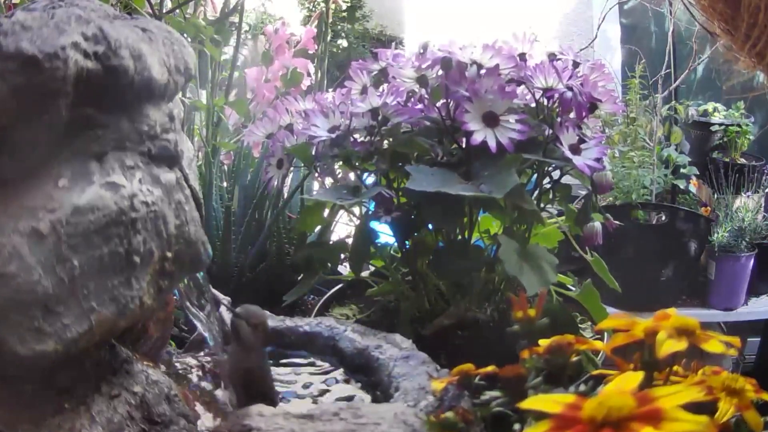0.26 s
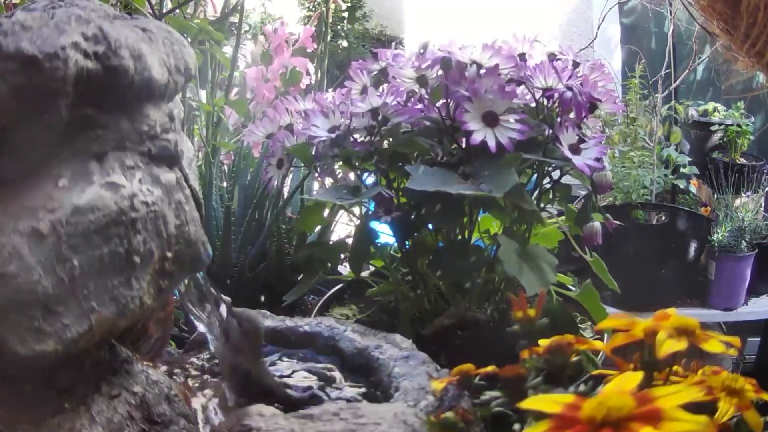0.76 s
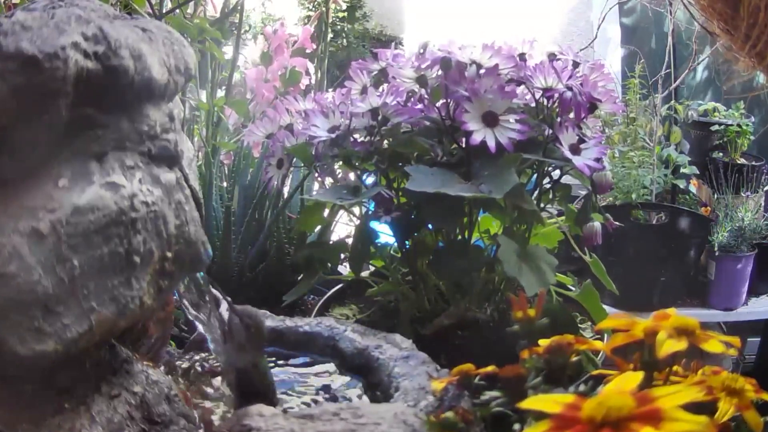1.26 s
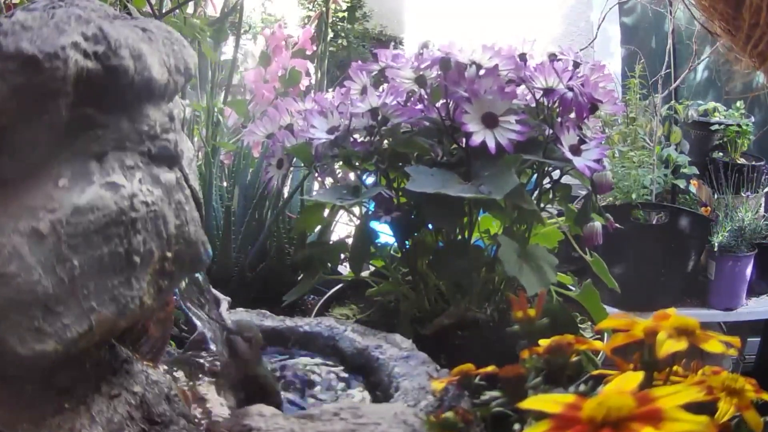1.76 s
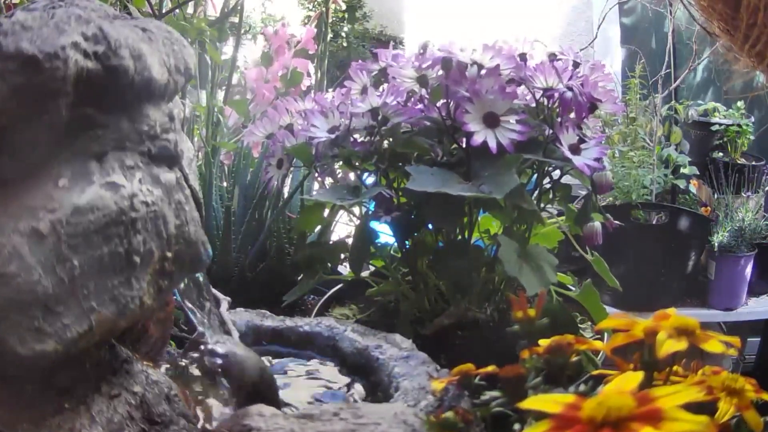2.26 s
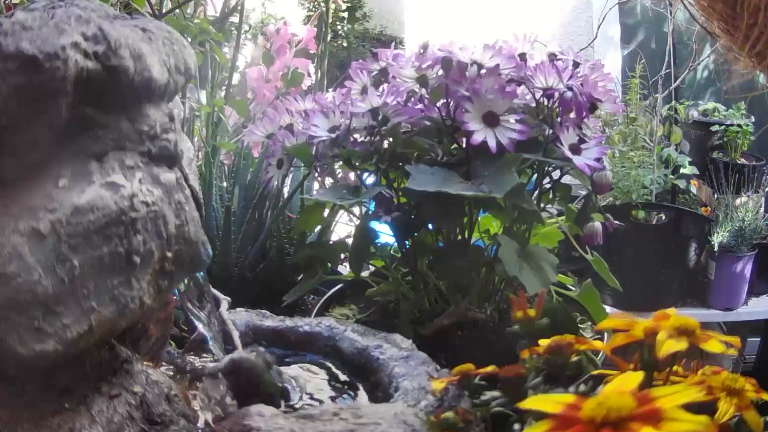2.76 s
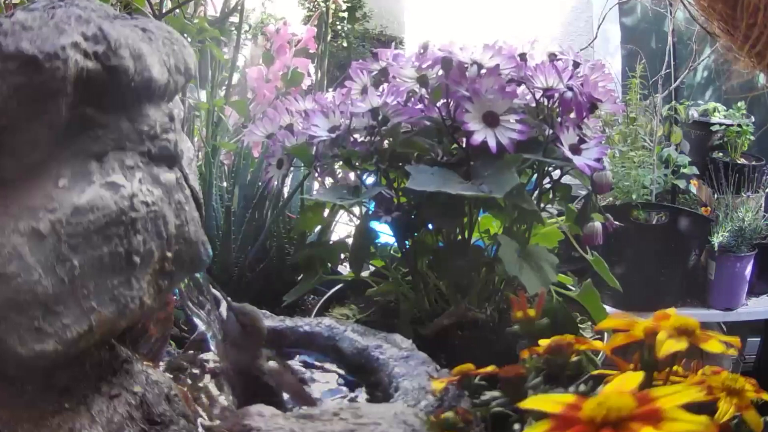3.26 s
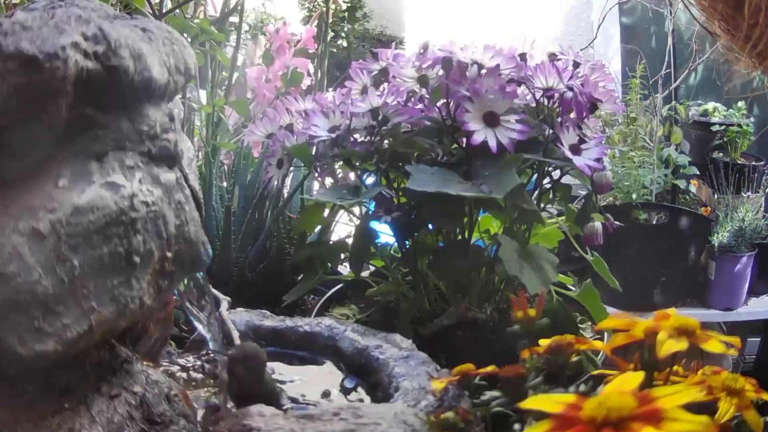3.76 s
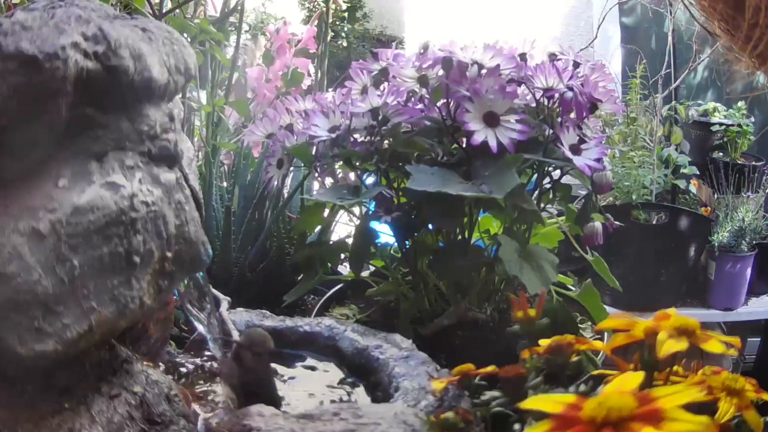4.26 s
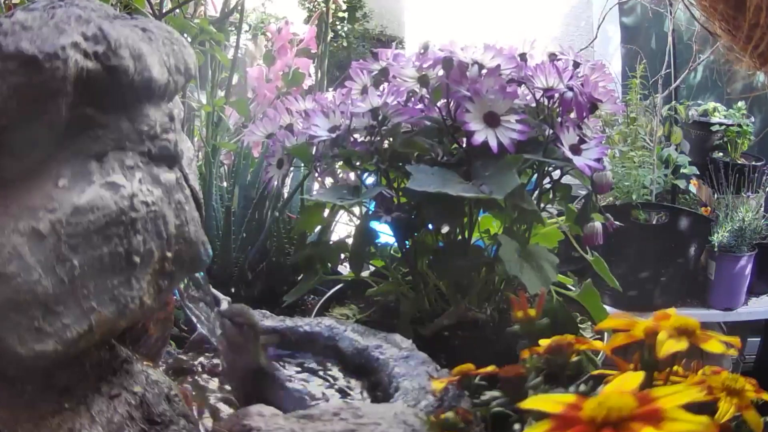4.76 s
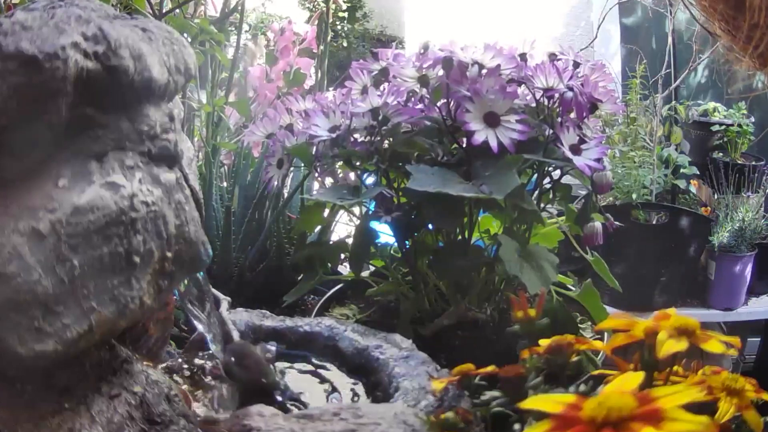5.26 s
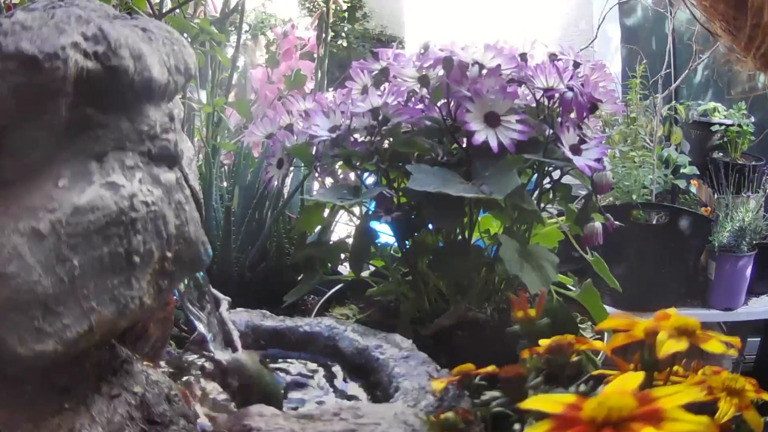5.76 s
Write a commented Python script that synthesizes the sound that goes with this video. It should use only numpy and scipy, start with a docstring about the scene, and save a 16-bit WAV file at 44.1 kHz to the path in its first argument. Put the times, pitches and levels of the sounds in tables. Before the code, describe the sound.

A thin trickle falls from a rock into a shallow garden basin, heard close up outdoors. Irregular drops plink, mostly high and glassy, with a few deeper plops and soft little splashes over a faint fizzing patter. One sharp bright tick stands out midway, another a little later. A dim traffic rumble swells early, then fades. The small microphone gives slightly dulled top end and little echo.

```python
"""A shallow garden basin, heard by one microphone in a small camera close by: water trickles in from a rock.
Each drop traps a bubble that rings for a few cycles, with a spray of smaller bubbles, a splash and a gulp
of noise. Short runs of like bubbles trickle between the drops, and a patter of tiny drops on noise fizz
comes and goes. Far behind the garden, traffic swells and fades as coloured noise with narrow drone bands.
A short diffuse tail of noise is the answer of rock and basin to the water."""
import sys
import numpy as np
from scipy import signal
from scipy.fft import rfft, irfft, next_fast_len
from scipy.io import wavfile
from scipy.ndimage import uniform_filter1d

SR = 44100
rng = np.random.default_rng(int(sys.argv[2]) if len(sys.argv) > 2 else 0)


def to_wav(sig):
    """Store sig (one row per channel, or 1-D mono) as 16-bit WAV at the path in sys.argv[1].

    Samples outside -1..1 are clipped; the rate is SR.
    """
    pcm = np.clip(np.atleast_2d(sig), -1, 1) * 32767
    pcm = np.round(pcm).astype(np.int16)
    wavfile.write(sys.argv[1], SR, pcm.T)  # frames by channels


N = 265173

# Fine patter close by: (time [s], deep level [dB], bright level [dB])
PATTER_LEVELS = [(0.0, -66.5, -62), (0.44, -61.5, -68), (1.2, -64, -62.5), (1.57, -66, -66.5),
                 (2.28, -62, -60), (2.78, -67.5, -69), (3.08, -62, -61), (3.55, -73.5, -68),
                 (4.75, -62.5, -67.5), (5.19, -78, -77), (5.66, -71.5, -75.5), (6.01, -71, -69.5)]
# Colour of the deep patter: (frequency [Hz], relative density [dB per Hz])
DEEP_COLOUR = [(290, -34), (500, -2), (1080, -8.5), (3190, -5), (4000, -27.5), (8800, -120)]
# Colour of the bright patter: (frequency [Hz], relative density [dB per Hz])
BRIGHT_COLOUR = [(1470, -21), (2500, -17.5), (5660, -4.5), (7310, -14), (8530, -22), (12000, -120)]
# Far traffic rumble: (time [s], level [dB])
TRAFFIC_LEVELS = [(0, -65.5), (1.4, -59.5), (2.8, -63.5), (3.55, -69.5), (4.2, -71), (6.01, -75.5)]
# Colour of the rumble: (frequency [Hz], relative density [dB per Hz])
RUMBLE_COLOUR = [(25, -23.5), (64, -17.5), (244, -2.5), (460, -5), (575, -10.5), (913, -9), (1500, -30.5),
                 (3300, -120)]
# Fuzzy engine drones within the rumble: (start [s], end [s], pitch [Hz], level [dB])
ENGINE_DRONES = [(.9, 1.703, 88.6, -74.5), (1.33, 1.498, 214, -62.5), (1.65, 1.92, 261, -61.5),
                 (1.0, 2.002, 357, -68), (2.093, 2.69, 211, -66.5), (2.684, 2.988, 249, -64)]
# Louder drops, before deep bubbles are weakened: (time of bubble peak [s], strength [dB], pitch [Hz])
DROP_BUBBLES = [(0.0261, -44.5, 1647), (0.035, -45.5, 4570), (0.15, -44.5, 2240), (0.211, -46.5, 2360),
                (0.328, -33, 5910), (0.356, -48, 1495), (0.379, -38, 6020), (0.5, -43.5, 6350),
                (0.7, -36, 4690), (0.7004, -31, 1217), (0.7024, -26.5, 1660), (0.726, -46, 2170),
                (0.7411, -36.5, 5200), (0.7434, -35, 2300), (0.8364, -39.5, 3050), (0.8376, -50, 1560),
                (0.859, -50, 2430), (0.8881, -38, 3010), (0.986, -37, 5170), (1.0042, -33.5, 3910),
                (1.0006, -29, 5920), (1.092, -40, 5300), (1.11, -33, 6880), (1.1122, -57, 5200),
                (1.1269, -52, 7500), (1.2246, -39.5, 4750), (1.2397, -33.5, 4020), (1.287, -44.5, 3600),
                (1.2848, -38.5, 1307), (1.289, -46, 740), (1.3096, -46, 1205), (1.352, -38.5, 2065),
                (1.428, -45, 3100), (1.4953, -34.5, 3310), (1.5263, -42, 4800), (1.5842, -37, 7280),
                (1.6237, -42.5, 2380), (1.6437, -50, 2450), (1.6674, -46.5, 2600), (1.7491, -41.5, 3900),
                (1.796, -49, 1304), (1.8328, -37.5, 4780), (1.884, -44, 4090), (2.0032, -43.5, 4940),
                (2.166, -32, 4570), (2.1827, -40, 3650), (2.186, -33.5, 5520), (2.198, -37.5, 3230),
                (2.206, -50, 5400), (2.2171, -33.5, 4580), (2.231, -42.5, 4860), (2.306, -36.5, 5900),
                (2.3083, -41, 4310), (2.308, -39, 2640), (2.34, -42.5, 1310), (2.341, -36.5, 2330),
                (2.345, -34.5, 3260), (2.3885, -32.5, 2940), (2.394, -47, 865), (2.4198, -38.5, 3720),
                (2.446, -36, 4540), (2.5127, -41.5, 5380), (2.611, -49.5, 686), (2.638, -44, 2510),
                (2.671, -41.5, 2530), (2.742, -55, 657), (2.8527, -37, 3910), (2.887, -39, 4360),
                (2.899, -39, 4320), (2.8999, -40.5, 698), (2.919, -33, 2330), (2.9237, -41, 4460),
                (2.997, -46.5, 4530), (3.0073, -53, 2270), (3.01, -39, 4160), (3.0284, -35.5, 3010),
                (3.0816, -19, 5210), (3.094, -40, 4500), (3.113, -40.5, 2420), (3.1186, -35.5, 4540),
                (3.1238, -44, 2200), (3.1335, -43.5, 4600), (3.1498, -42, 4870), (3.2063, -36.5, 4610),
                (3.2194, -41, 5100), (3.2367, -49, 5100), (3.283, -54.5, 1200), (3.372, -38.5, 3520),
                (3.441, -45, 5620), (3.447, -45.5, 2120), (3.683, -44, 2670), (3.7015, -52.5, 830),
                (3.7516, -36.5, 3200), (3.7788, -36.5, 6520), (3.791, -39, 5900), (3.831, -38.5, 6980),
                (3.834, -34.5, 5820), (3.9107, -41.5, 3670), (3.9295, -48, 2290), (3.9747, -39.5, 5080),
                (3.998, -41.5, 4840), (4.011, -51.5, 4570), (4.1392, -43.5, 2190), (4.03, -49, 4650),
                (4.1636, -51, 3300), (4.282, -47.5, 2510), (4.288, -45, 4720), (4.3371, -40, 2160),
                (4.379, -41, 2110), (4.4088, -42, 914), (4.4176, -42.5, 4450), (4.4332, -42.5, 990),
                (4.4363, -31, 2440), (4.4375, -22, 4820), (4.4466, -43, 940), (4.4948, -47.5, 940),
                (4.56, -59.5, 880), (4.6255, -43.5, 4930), (4.6271, -42, 2900), (4.707, -40.5, 3410),
                (4.724, -48.5, 1190), (4.7542, -44.5, 2400), (4.7856, -42, 4870), (4.905, -37, 1936),
                (4.906, -40, 2850), (4.9471, -37, 4300), (4.96, -34, 3570), (4.9681, -37.5, 680),
                (4.986, -35, 3330), (4.996, -47, 717), (4.9965, -31, 2270), (5.041, -36.5, 2260),
                (5.068, -40.5, 3250), (5.071, -38, 1930), (5.17, -42.5, 2400), (5.2222, -48, 684),
                (5.2469, -41.5, 4110), (5.312, -56, 4480), (5.3626, -48.5, 2540), (5.3635, -51.5, 4870),
                (5.3926, -49, 4670), (5.401, -37, 4230), (5.4039, -48, 1344), (5.408, -42.5, 2340),
                (5.4415, -47.5, 2980), (5.465, -42, 2450), (5.5136, -35.5, 2530), (5.5163, -39, 4500),
                (5.5414, -41, 2330) , (5.738, -47, 5540), (5.794, -41.5, 5480), (5.8048, -36, 4040),
                (5.822, -39.5, 3720), (5.886, -47.5, 2900), (5.962, -39.5, 3510), (5.974, -38, 6230),
                (5.978, -52.5, 720), (6.003, -51, 1200)]
# Colour of a splash: (frequency [Hz], relative density [dB per Hz])
SPLASH_COLOUR = [(150, -18), (600, 1), (2500, -3), (5500, 0.5), (8500, -15.5)]
# Trickling runs: (start [s], end [s], middle pitch [Hz], highest bubble peak [dB])
TRICKLE_RUNS = [(0.3, 0.369, 2100, -53.5), (0.395, 0.437, 5350, -49.5), (0.504, 0.573, 2030, -60.5),
                (2.558, 2.621, 1580, -51), (3.649, 3.696, 1154, -59), (3.857, 3.971, 2334, -50),
                (5.19, 5.227, 5500, -50)]

# Gulp under a 2000 Hz drop: offset from 0.63 x drop strength [dB], 60 dB fall [s], 1/e half width [octaves]
GULP_DB, GULP_T60, GULP_OCT = -24, 0.065, 0.51
GULP_DEEP_DB = 2  # gain per octave deeper [dB]
TOP_HZ = 8689  # band limit of the camera [Hz]


def amp(db):
    """Gain of a level in dB."""
    return 10 ** (np.asarray(db) / 20)


def unit(x):
    """Scale to rms 1."""
    return x / np.sqrt(np.mean(x ** 2) + 1e-20)


def curves(rows):
    """Interpolate each column after the time to one value per sample."""
    s, *cols = np.transpose(rows)
    return [np.interp(np.arange(N) / SR, s, c) for c in cols]


def filtered(x, response):
    """Multiply the spectrum of x by a response of frequency."""
    m = next_fast_len(N + 8192)
    spectrum = rfft(x, m) * response(np.fft.rfftfreq(m, 1 / SR))
    return irfft(spectrum, m)[..., :N]


def coloured(x, spectrum):
    """Give x the colour of (Hz, dB) points joined on a log frequency axis, at rms 1."""
    f, db = np.transpose(spectrum)
    return unit(filtered(x, lambda hz: amp(np.interp(np.log(hz + 1), np.log(f + 1), db))))


def patchy(patchy_db, wide, long):
    """Noise whose gain varies in random patches, wide in frequency bins and long in frames."""
    z = signal.stft(rng.standard_normal(N), nperseg=256)[2]
    field = uniform_filter1d(rng.standard_normal(z.shape), round(wide), axis=0)
    field = uniform_filter1d(field, round(long), axis=1)
    return signal.istft(z * amp(patchy_db * unit(field)), nperseg=256)[1][:N]


def bubbles(s, gain, hz, fade, swell, glide, size):
    """Sum of bubbles: a soft swell to the peak at s, a fade, the pitch rising as each nears the surface."""
    s, gain, hz, fade = (np.asarray(v, float)[:, None] for v in (s, gain, hz, fade))
    step = np.arange(size) - size // 4
    t = step / SR
    before = np.exp(-(t / (swell * np.sqrt(fade * .001))) ** 2)
    after = np.exp(-(np.abs(t) / fade) ** 1.4)
    shape = np.where(t < 0, before, after)
    turns = hz * t * (1 + glide * np.tanh(t / (4 * fade))) + rng.random(s.shape)
    wave = gain * shape * np.sin(2 * np.pi * turns)
    # samples past the end gather in one spare slot, which is cut off
    at = np.clip(np.round(s * SR).astype(int) + step, 0, N)
    return np.bincount(at.ravel(), wave.ravel(), N + 1)[:N]


def grains(count, low_hz, high_hz, spread_db, cycles):
    """Random small drops: each a clump of bubbles of like size that starts strong and thins out."""
    clump = np.repeat(rng.random((count, 3)), 8, axis=0)  # eight bubbles share a clump
    draw = rng.random((len(clump), 4))
    late = 0.026 * draw[:, 0] ** 2
    place = np.clip(clump[:, 1] + 0.28 * (draw[:, 1] - .5), 0, 1)
    hz = low_hz * (high_hz / low_hz) ** place
    size_db = -spread_db * np.log(1 - .95 * clump[:, 2]) - 7.3 * draw[:, 2] - 760 * late
    fade = cycles * (.5 + draw[:, 3]) / hz
    return unit(bubbles(clump[:, 0] * N / SR + late, amp(size_db) * np.sqrt(hz), hz, fade,
                        swell=.7, glide=.03, size=768))


def patter():
    """Small ringing drops on a thin fizz of noise; the deep and bright parts swell on their own."""
    deep_db, bright_db = curves(PATTER_LEVELS)
    deep = grains(count=800, low_hz=1112, high_hz=3910, spread_db=3, cycles=8.2)
    deep = deep + 0.89 * patchy(3.9, wide=4, long=6)
    bright = grains(count=900, low_hz=2810, high_hz=8130, spread_db=6, cycles=7)
    bright = bright + 0.46 * patchy(6.9, wide=5, long=6)
    return amp(deep_db) * coloured(deep, DEEP_COLOUR) + amp(bright_db) * coloured(bright, BRIGHT_COLOUR)


def drones():
    """Far engines: each a narrow band of noise around its pitch that fades in and out."""
    out, t = np.zeros(N), np.arange(N) / SR
    for start, end, pitch_hz, db in ENGINE_DRONES:
        half_width = .07 * pitch_hz
        band = unit(filtered(rng.standard_normal(N),
                             lambda hz: 1 / (1 + ((hz - pitch_hz) / half_width) ** 2)))
        fade = np.clip(np.minimum(t - start, end - t) / .06, 0, 1)
        out += amp(db) * fade * band
    return out


def traffic():
    """Far traffic: a low, slightly lumpy rumble of coloured noise with the engine drones in it."""
    level_db, = curves(TRAFFIC_LEVELS)
    rumble = coloured(patchy(2.2, wide=2, long=20), RUMBLE_COLOUR)
    return amp(level_db) * rumble + drones()


def splashes():
    """The surface is struck just before each bubble peaks: a quick slap of noise, then a softer wash."""
    s, db, _ = np.transpose(DROP_BUBBLES)
    blows = np.bincount(np.round((s - .0022) * SR).astype(int), amp(0.66 * db), N)[:N]
    t = np.arange(SR // 8) / SR
    rise = 1 - np.exp(-t / 0.001)
    slap = amp(-30.5 - 60 * t / 0.013)
    wash = amp(-36.5 - 60 * t / 0.077)
    envelope = signal.fftconvolve(blows, rise * (slap + wash))[:N]
    return envelope * coloured(patchy(0.37, wide=5, long=3), SPLASH_COLOUR)


def gulps():
    """The cavity under each drop collapses in a noise burst; deep ones are louder, wider and longer."""
    out, t, f = np.zeros(N + SR), np.arange(SR // 8) / SR, np.fft.rfftfreq(SR // 8, 1 / SR)
    for s, db, hz in DROP_BUBBLES:
        deep = np.log2(2000 / hz)  # octaves below 2000 Hz
        band = np.exp(-(np.log2((f + 1) / hz) / (GULP_OCT * 1.75 ** deep)) ** 2)
        noise = unit(irfft(rfft(rng.standard_normal(len(t))) * band, len(t)))
        fall_db = 0.63 * db + GULP_DB + GULP_DEEP_DB * deep - 60 * t / (GULP_T60 * 1.5 ** deep)
        rise = 1 - np.exp(-t / 0.0009)
        start = round((s - .002 * 1.3 ** deep) * SR)
        out[start:][:len(t)] += amp(fall_db) * rise * noise
    return out[:N]


def main_bubbles():
    """The air trapped by each drop rings; high bubbles die sooner, deep ones ring less clearly."""
    s, db, hz = np.transpose(DROP_BUBBLES)
    fade = 0.0041 * (np.maximum(hz, 1150) / 2000) ** -1.05
    ring = amp(db - 4 * np.clip(np.log2(1200 / hz), 0, 2))
    return bubbles(s, ring, hz, fade, swell=0.66, glide=0.0073, size=2048)


def spray():
    """Twelve weaker bubbles scatter around each main one, most of them soon after it."""
    s, db, hz = np.transpose(DROP_BUBBLES)[..., None]
    draw = rng.random((len(s), 12, 3))
    late = -.011 * np.log(1 - draw[..., 0] / 1.03) - .0015
    size_db = 0.75 * db - 17.0 - 300 * np.abs(late) - 8 * draw[..., 1]
    pitch = np.clip(hz * np.exp(0.4 * (draw[..., 2] - .45)), 300, 8400)
    return bubbles((s + late).ravel(), amp(size_db).ravel(), pitch.ravel(), (4.5 / pitch).ravel(),
                   swell=.7, glide=.04, size=1024)


def drops():
    """Each louder drop joins its ringing bubble, spray, splash and gulp."""
    return main_bubbles() + spray() + splashes() + gulps()


def runs():
    """A thread of water meets the surface and releases many bubbles of like size."""
    start, end, hz, db = np.transpose(TRICKLE_RUNS)[..., None]
    draw = rng.random((3, len(TRICKLE_RUNS), 24))  # 24 bubbles a run
    s = start + (end - start) * draw[0]
    pitch = (hz * np.exp(0.46 * (draw[1] - .5))).ravel()
    gain = amp(db - 10.2 * draw[2])
    return bubbles(s.ravel(), gain.ravel(), pitch, 7.5 / pitch, swell=0.74, glide=0.011, size=1024)


def basin(x):
    """Rock and basin answer with a short diffuse tail, drawn anew every quarter second."""
    out, hop, t = np.zeros(N + SR), SR // 4, np.arange(SR // 8) / SR
    for start in range(0, N, hop):
        envelope = amp(-60 * t / 0.082) * np.clip(t / 0.0023, 0, 1)
        tail = rng.standard_normal(len(t)) * envelope
        wet = signal.fftconvolve(x[start:start + hop], tail / np.linalg.norm(tail))
        out[start:start + len(wet)] += wet
    return out[:N]


def scene():
    """One microphone hears the water and its basin close by, and the traffic far off."""
    water = patter() + drops() + runs()
    return (water + amp(-13.5) * basin(water) + traffic())[None]


def record(dry):
    """The camera rolls off towards its band limit and keeps nothing above."""
    return filtered(dry, lambda hz: (hz < TOP_HZ) / np.sqrt(1 + (hz / 7900) ** 40))


dry = scene()
out = record(dry)
to_wav(out)
```